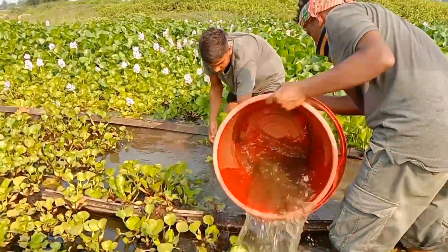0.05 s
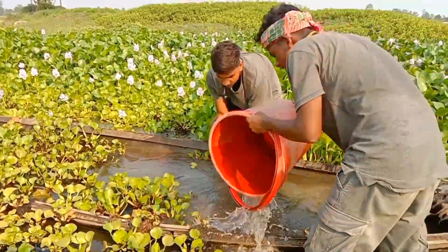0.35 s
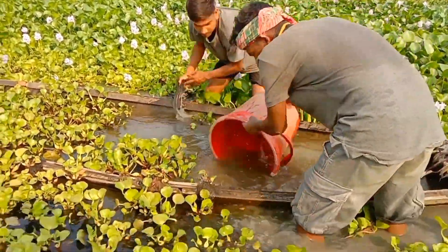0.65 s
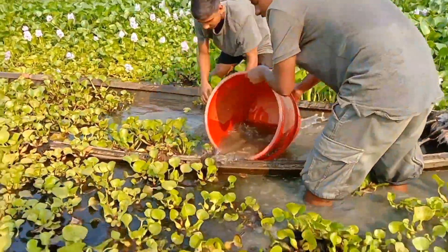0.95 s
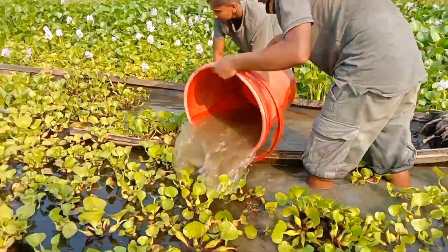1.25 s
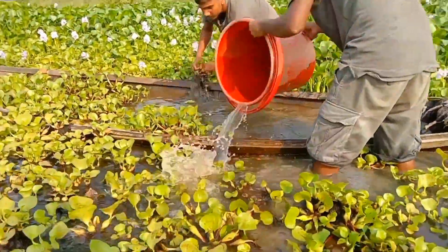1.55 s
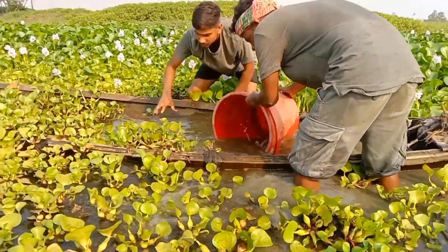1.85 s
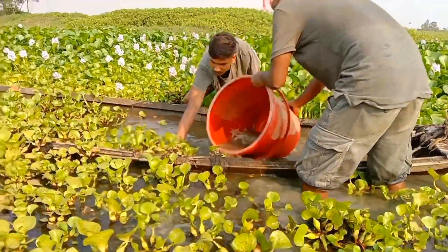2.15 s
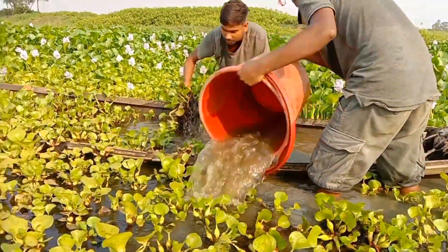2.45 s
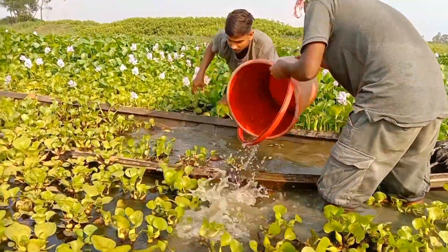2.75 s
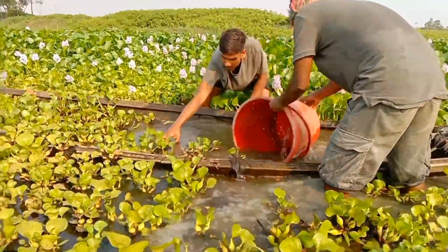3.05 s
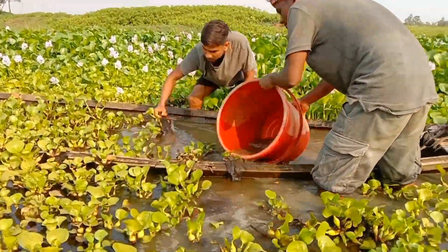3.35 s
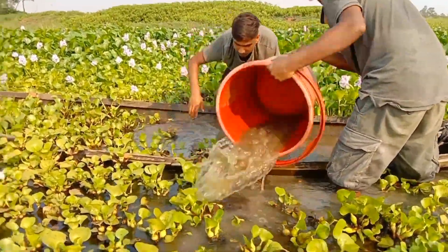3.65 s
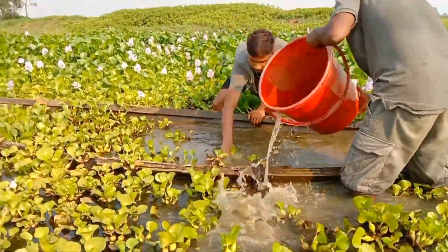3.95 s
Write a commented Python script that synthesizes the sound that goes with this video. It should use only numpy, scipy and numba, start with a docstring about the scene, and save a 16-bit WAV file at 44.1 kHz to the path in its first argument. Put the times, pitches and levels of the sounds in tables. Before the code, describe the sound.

Four bucketfuls of water splash onto a weedy pond as a flooded boat is bailed. Each bubbly, slapping pour alternates with lighter sloshing, trickling and dull plastic knocks, picked up by one microphone in quiet open air.

```python
"""A bucketful of water splashes onto a weedy pond, the first of four bailed from a flooded wooden boat.
Each pour falls as dense spray and small bubbles, with heavier lumps of water slapping the surface.
Between pours the plastic bucket knocks, dips, churns and gulps air, and water sloshes and drips back.
Heard outdoors on one microphone, with faint open air behind and brief reflections from close by."""
import sys
import numpy as np
from scipy import signal
from scipy.fft import rfft, irfft
from scipy.io import wavfile
from scipy.ndimage import uniform_filter1d
from numba import njit

SR = 44100
rng = np.random.default_rng(int(sys.argv[2]) if len(sys.argv) > 2 else 0)


def pcm_store(signal):
    """Save signal as 16-bit PCM."""
    levels = np.round(np.clip(np.atleast_2d(signal), -1, 1) * 32767)
    wavfile.write(sys.argv[1], SR, levels.astype(np.int16).T)


N = 176400
T = np.arange(N) / SR
BUBBLE_GLIDE = 0.038  # pitch rise per decay time, as a share of the starting pitch

# Spectrum of spray landing on the pond. Each row: frequency in Hz, relative level in dB.
SPRAY_SPECTRUM = [(100, -29), (300, -20.5), (500, -4), (1100, 1), (1380, 4), (1900, -4.5), (2550, 0.5),
                  (3000, -2), (3500, 1), (4300, -6), (5600, -6), (6400, -14.5), (7900, -12), (9200, -21.5),
                  (11400, -24), (13000, -19), (15800, -19)]
# Spectrum of the low body of plunging water. Each row: frequency in Hz, relative level in dB.
BODY_SPECTRUM = [(60, -33.5), (150, -7), (270, 5), (420, -1.5), (650, -12.5), (1200, 5.5), (3000, -80)]


def amp(db):
    """Decibels to gain."""
    return 10 ** (np.asarray(db) / 20)


def unit(x):
    """Scales to rms 1."""
    return x / np.sqrt(np.mean(x ** 2) + 1e-20)


def add(mix, start_s, sound):
    """Mixes a sound in at a time."""
    part = mix[max(round(start_s * SR), 0):][:len(sound)]
    part += sound[:len(part)]


def level(curve, column=1):
    """Gain along a curve of seconds and dB, dying at 500 dB a second outside it."""
    times, db = np.transpose(curve)[[0, column]]
    outside_s = np.maximum(np.maximum(times[0] - T, T - times[-1]), 0)
    return amp(np.interp(T, times, db) - 500 * outside_s)


def colour(x, spectrum, tilt_db=0):
    """Causal filter with the given spectrum, tilted per octave; the result has rms 1."""
    size = 4096
    octave = np.log2(np.fft.rfftfreq(size, 1 / SR) + 1)
    hz, db = np.transpose(spectrum)
    cepstrum = irfft(np.log(amp(np.interp(octave, np.log2(hz), db) + tilt_db * octave)))
    cepstrum[1:size // 2] *= 2  # minimum phase keeps attacks sharp
    cepstrum[size // 2 + 1:] = 0
    impulse = irfft(np.exp(rfft(cepstrum)))
    return unit(signal.oaconvolve(x, impulse)[:len(x)])


@njit
def ring_all(size, rows, glide):
    """Sums small rising bubbles. Each row: start in samples, radians per sample, gain, decay in samples."""
    out = np.zeros(size)
    for start, step, gain, decay in rows:
        for i in range(min(int(5 * decay), size - int(start))):
            envelope = gain * np.exp(-i / decay) * min(i * step / 5, 1.)
            out[int(start) + i] += envelope * np.sin(step * i * (1 + glide * i / decay / 2))
    return out


def fizz(per_s, spread_db, cycles, low_hz, high_hz):
    """A cloud of bubbles, each ringing with its own pitch, strength and decay."""
    onset, pitch, size, life = rng.random((50000, 4))[:int(per_s * N / SR)].T
    hz = (np.sqrt(low_hz) + pitch * (np.sqrt(high_hz) - np.sqrt(low_hz))) ** 2
    decay = np.minimum(cycles / hz, .012) * (.5 + life) * SR
    gain = amp(spread_db * np.minimum(-np.log(1 - size), 3.5)) * np.sqrt(np.sqrt(hz) / decay)
    rows = np.column_stack([onset * N, 2 * np.pi * hz / SR, gain, decay])
    return unit(ring_all(N, rows, BUBBLE_GLIDE))


def spatter(per_s, spread_db, burst_s):
    """Drops of unequal size burst on water at random, each a short spit of noise."""
    t = np.arange(SR // 20) / SR
    chance, size, _ = rng.random((3, N))
    impacts = (chance < per_s / SR) * amp(spread_db * np.minimum(-np.log(size + 1e-9), 3.5))
    power = abs(signal.oaconvolve(impacts ** 2, np.exp(-2 * t / burst_s))[:N])
    return unit(np.sqrt(power) * rng.standard_normal(N))


def patchy(x, depth_db, span_hz=480, span_s=.019, smooth_above_hz=4500):
    """Drops land in clusters, so narrow bands flare briefly at random; the treble stays smoother."""
    frame, hop = 512, 128
    bands = signal.stft(x, nperseg=frame, noverlap=frame - hop)[2]
    across = np.fft.fftfreq(bands.shape[0], SR / frame)[:, None]
    along = np.fft.fftfreq(bands.shape[1], hop / SR)
    blur = np.exp(-(across * span_hz) ** 2 - (along * span_s) ** 2)
    flare = unit(np.fft.ifft2(np.fft.fft2(rng.standard_normal(bands.shape)) * blur).real)
    flare /= np.hypot(1, np.linspace(0, SR / 2, len(bands)) / smooth_above_hz)[:, None]
    return unit(signal.istft(bands * amp(depth_db * flare), nperseg=frame, noverlap=frame - hop)[1][:N])


def open_air():
    """A faint, steady hush lies behind everything, strongest in the bass."""
    return amp(-73) * colour(rng.standard_normal(N), [(20, -11.5), (15800, -34)])


def reflections(x, decay_s=.011):
    """Nearby surfaces send a brief, faint scatter back to the microphone."""
    t = np.arange(SR // 6) / SR
    taps = rng.standard_normal(len(t)) * (rng.random(len(t)) < .05) * np.exp(-t / decay_s) * (t > .003)
    return amp(-18) * signal.oaconvolve(x, taps / np.linalg.norm(taps))[:N]


def drips():
    """Runoff trickles thickly over leaves and into the water."""
    # Flow of the trickle. Each row: time in seconds, level in dB.
    flow = [(0.0, -41), (0.43, -37.5), (0.6, -50), (0.8, -40.5), (1.11, -51), (1.17, -67), (1.6, -41),
            (2.0, -49), (2.35, -50), (2.75, -39.5), (3.0, -57.5), (3.4, -44), (4.0, -57)]
    # Spectrum of the patter. Each row: frequency in Hz, relative level in dB.
    spectrum = [(600, -38), (1400, 2.5), (3800, 6), (5500, 1), (8000, -2), (11400, -16.5), (14000, -4.5),
                (15800, -11)]
    plinks = fizz(per_s=2500, spread_db=2, cycles=6, low_hz=1500, high_hz=6000)
    drops = spatter(per_s=800, spread_db=3.6, burst_s=.003) + amp(-5) * plinks
    return colour(patchy(drops, depth_db=3.6), spectrum) * level(flow)


def slosh():
    """Small waves fold over, crackling and trapping a few bubbles."""
    # Water washing round the bucket and the boat. Each row: time in seconds, level in dB.
    swell = [(0.5, -40.5), (0.612, -53.5), (0.645, -37), (0.695, -42.5), (0.79, -40.5), (0.925, -57),
             (0.97, -45.5), (1.06, -44.5), (1.21, -69), (1.62, -79), (1.69, -37), (1.795, -43),
             (1.84, -36.5), (1.91, -53), (2.05, -52.5), (2.1, -39.5), (2.19, -36.5), (2.27, -46.5),
             (2.4, -78), (2.8, -48.5), (2.93, -28.5), (2.975, -44), (3.05, -41), (3.14, -39.5),
             (3.22, -48.5), (3.41, -49.5), (3.5, -43.5), (3.57, -55)]
    # Spectrum of the wash. Each row: frequency in Hz, relative level in dB.
    spectrum = [(60, -22), (200, -14.5), (480, 2.5), (640, -2.5), (800, 0), (1000, 0), (1320, 4.5),
                (1750, -7.5), (3600, -3.5), (5200, -8.5), (6700, -10), (8000, -5.5), (9400, -19.5),
                (11500, -20.5), (13600, -12), (15800, -32)]
    bubbles = fizz(per_s=900, spread_db=3, cycles=5, low_hz=250, high_hz=5000)
    water = bubbles + spatter(per_s=700, spread_db=3, burst_s=.006)
    return colour(patchy(water, depth_db=3.6), spectrum) * level(swell)


def churning(rise_s=0.0031, fade_s=.025):
    """Big bubbles tumble as water rushes into the bucket."""
    # The bucket ploughing under. Each row: start in seconds, hold in seconds, level in dB.
    dips = [(0.646, 0.032, -38), (1.813, 0.037, -36), (1.91, 0.16, -52.5), (2.896, 0.016, -35.5),
            (3.061, 0.1, -37.5)]
    # Spectrum of the low tumble. Each row: frequency in Hz, relative level in dB.
    spectrum = [(20, -92), (75, -4.5), (120, -7.5), (210, -3.5), (380, -20), (1500, -56), (4000, -77)]
    tumble = colour(fizz(per_s=900, spread_db=2.5, cycles=5.3, low_hz=40, high_hz=1200), spectrum)
    envelope = np.zeros(N)
    for start_s, hold_s, db in dips:
        t = T - start_s
        envelope += amp(db) * np.clip(t / rise_s, 0, 1) * np.exp(-np.maximum(t - hold_s, 0) / fade_s)
    return tumble * envelope


def hollows(q=6.4, flutter_db=2.5, flutter_s=.02):
    """Splashing rings the air in the bucket or under a fold of water."""
    # Hollows whose note glides as they open or close.
    # Each row: start in seconds, length in seconds, first and last pitch in Hz, level in dB.
    cavities = [(0.633, 0.033, 1300, 1280, -34), (0.68, 0.44, 784, 800, -45),
                (0.965, 0.038, 274, 346, -40.5), (1.157, 0.043, 1040, 1330, -47),
                (1.3, 0.21, 340, 342, -44), (1.532, 0.076, 375, 520, -44.5), (2.108, 0.11, 253, 252, -45),
                (2.165, 0.036, 684, 950, -46), (2.939, .028, 2200, 1980, -34),
                (2.981, 0.021, 1030, 1280, -35), (3.386, 0.055, 1270, 850, -44.5),
                (3.457, 0.034, 566, 447, -43.5), (3.69, 0.037, 440, 445, -34),
                (3.756, 0.17, 1080, 1510, -38)]
    out = np.zeros(N)
    for start_s, length_s, start_hz, end_hz, db in cavities:
        progress = np.linspace(0, 1, int(length_s * SR))
        carrier = np.exp(2j * np.pi * np.cumsum(start_hz + (end_hz - start_hz) * progress) / SR)
        width_hz = start_hz / q + 2.5 / length_s  # short-lived hollows ring less clearly
        pole = np.exp(-np.pi * width_hz / SR)
        splash = rng.standard_normal(N)[:len(progress)]
        ring = carrier * signal.lfilter([1], [1, -2 * pole, pole * pole], splash / carrier)
        flutter = unit(uniform_filter1d(rng.standard_normal(N), int(flutter_s * SR)))[-len(progress):]
        arch = abs(np.sin(np.pi * progress)) ** 0.16
        add(out, start_s, amp(db) * unit(ring.real * amp(flutter_db * flutter) * arch))
    return out


def gulps(rise_cycles=0.52, wobble=0.029):
    """Large air pockets gulp and smaller ones plop, rising in pitch as they near the surface."""
    # Single air pockets. Each row: start in seconds, pitch in Hz, level in dB, decay time in seconds.
    pockets = [(0.221, 262, -13, 0.0048), (0.348, 890, -14, 0.0023), (0.537, 1240, -15, 0.003),
               (3.08, 220, -30, 0.022), (0.646, 180, -19, 0.012), (0.812, 125, -18, 0.012),
               (1.036, 590, -23, 0.0077), (1.081, 776, -27.5, 0.0076), (1.261, 675, -19.5, 0.013),
               (1.428, 286, -19.5, 0.016), (2.174, 720, -26.5, 0.0063), (2.645, 252, -15.5, 0.0046),
               (3.177, 112, -30.5, 0.02), (3.201, 1416, -28.5, 0.0058), (3.946, 1190, -11, 0.0037),
               (3.947, 225, -10.5, 0.0041)]
    out = np.zeros(N)
    for start_s, hz, db, decay_s in pockets:
        t = np.arange(int(7 * decay_s * SR) + 2) / SR
        shake = unit(uniform_filter1d(rng.standard_normal(N // 4), int(SR / hz) + 1))[:len(t)]
        turns = np.cumsum(hz * (1 + BUBBLE_GLIDE * t / decay_s + wobble * shake)) / SR
        envelope = (1 - np.exp(-(t * hz / rise_cycles) ** 2)) * np.exp(-t / decay_s)
        add(out, start_s, amp(db) * envelope * np.sin(2 * np.pi * turns))
    return out


def knocks(rattle_db=-1.5, rattle_s=0.011):
    """A hard blow and a brief rattle ring the damped wall of the bucket."""
    # The bucket knocking as it is shoved under. Each row: start in seconds, level in dB.
    blows = [(0.534, -23), (0.819, -20), (0.946, -21.5), (1.81, -24.5), (2.062, -28.5), (3.075, -22.5)]
    # Modes of its water-loaded plastic wall. Each row: pitch in Hz, level in dB, decay time in seconds.
    modes = [(209, -5.5, 0.012), (546, -6, 0.0024), (850, -5, 0.0036), (1290, -5, 0.0026),
             (2200, -8.5, 0.0013)]
    out, t = np.zeros(N), np.arange(SR // 10) / SR
    for start_s, db in blows:
        wall = sum(amp(mode_db) * np.sin(2 * np.pi * hz * rng.uniform(.94, 1.06) * t)
                   * np.exp(-t / decay_s) for hz, mode_db, decay_s in modes)
        chatter = rng.standard_normal(len(t)) * t * np.exp(-2 * t / rattle_s)
        rattle = signal.oaconvolve(wall, chatter / np.linalg.norm(chatter))[:len(t)]
        add(out, start_s, amp(db) * (wall + amp(rattle_db) * rattle))
    return out


def slaps(rise_s=0.0027, fade_s=0.0082):
    """Each lump of water lands with a sudden dense burst that dies fast."""
    # Lumps hitting the surface.
    # Each row: start in seconds, level in dB, hold in seconds, brightness in dB per octave.
    lumps = [(0.006, -26, 0.019, -1.5), (0.221, -21, 0.012, 1), (0.347, -24.5, 0.0091, -1),
             (0.468, -31.5, 0.0052, 2.5), (0.532, -20.5, 0.0062, 1.5), (0.545, -23, 0.0038, 0),
             (0.619, -34.5, 0.004, 0.5), (0.634, -33.5, 0.016, -4), (0.708, -29, 0.0072, 1),
             (1.031, -34, 0.011, -2.5), (1.265, -31.5, 0.024, -0.5), (1.427, -25, 0.016, -2.5),
             (1.446, -27, 0.012, -4.5), (3.127, -40.5, 0.035, 3.5), (1.663, -32, 0.02, 0),
             (1.738, -31, 0.032, -1.5), (1.934, -32.5, 0.0058, 3), (2.077, -32.5, 0.025, 0.5),
             (2.278, -40.5, 0.015, -0.5), (2.498, -26.5, 0.019, -2), (2.594, -22, 0.019, -2.5),
             (2.654, -25.5, 0.0083, 0), (2.854, -35, 0.0084, 2.5), (2.926, -28, 0.0069, 1),
             (3.455, -29.5, 0.014, 3), (3.512, -38, 0.019, 1), (3.641, -36.5, 0.029, 5.5),
             (3.676, -26.5, 0.017, 2), (3.944, -17.5, 0.0017, -3.5)]
    out, t = np.zeros(N), np.arange(SR // 8) / SR
    water = spatter(per_s=1500, spread_db=-2.5, burst_s=0.00047)
    water += fizz(per_s=9000, spread_db=2.5, cycles=6.45, low_hz=286, high_hz=9640)
    for start_s, db, hold_s, tilt_db in lumps:
        burst = water[rng.integers(N - len(t)):][:len(t)]
        envelope = np.minimum(t / rise_s, 1) * np.exp(-np.maximum(t - hold_s, 0) / fade_s)
        spray = colour(burst, SPRAY_SPECTRUM, tilt_db)
        body = amp(-14.5 - 2 * tilt_db) * colour(burst, BODY_SPECTRUM)  # duller slaps carry more body
        add(out, start_s, amp(db) * envelope * (spray + body))
    return out


def pours():
    """The stream breaks into spray and bubbles, with a low body where it plunges deep."""
    # The falling stream, one curve per pour. Each row: time in seconds, spray and body levels in dB.
    streams = [
        [(0.0, -26.5, -72), (0.04, -37.5, -48), (0.1, -33.5, -68), (0.142, -25, -62), (0.165, -35.5, -50),
         (0.205, -24.5, -38.5), (0.32, -30.5, -42), (0.44, -39.5, -56)],
        [(1.215, -69, -87), (1.245, -39, -80), (1.265, -28.5, -29.5), (1.32, -32.5, -42.5), (1.37, -32.5, -35),
         (1.45, -28.5, -33), (1.51, -30.5, -88), (1.585, -34, -52), (1.655, -44.5, -56)],
        [(2.385, -78, -77), (2.405, -38, -86), (2.44, -29, -49), (2.51, -29, -37.5), (2.59, -31, -36),
         (2.655, -28.5, -33.5), (2.7, -34, -42.5), (2.79, -48.5, -66)],
        [(3.63, -45.5, -63), (3.678, -36, -46), (3.695, -25, -28), (3.745, -28.5, -50), (3.81, -31, -42),
         (3.865, -28.5, -37), (3.91, -36.5, -48), (3.938, -39, -42), (3.965, -30.5, -25.5), (4.0, -35, -49)],
    ]
    bubbles = fizz(per_s=5000, spread_db=2.7, cycles=4.5, low_hz=400, high_hz=8000)
    sheet = spatter(per_s=3000, spread_db=1.5, burst_s=0.004)
    spray = colour(patchy(bubbles + amp(7) * sheet, depth_db=2.2), SPRAY_SPECTRUM)
    body = colour(fizz(per_s=3000, spread_db=6, cycles=2.06, low_hz=67, high_hz=1560), BODY_SPECTRUM)
    return sum(spray * level(curve) + body * level(curve, column=2) for curve in streams)


def scene():
    """The bailing and its reflections reach one microphone over faint open air."""
    bailing = pours() + slosh() + drips() + slaps() + knocks() + gulps() + hollows() + churning()
    return (bailing + reflections(bailing) + open_air())[None]


def record(dry):
    """The deepest bass is cut away, and the recorder's band limit ends the treble."""
    low_cut_hz, band_limit_hz = 70, 15850
    low_cut = signal.butter(2, low_cut_hz, "high", fs=SR, output="sos")
    band_limit = signal.firwin(511, band_limit_hz, window=("kaiser", 9), fs=SR)
    return signal.oaconvolve(signal.sosfilt(low_cut, dry), band_limit[None], "same")


dry = scene()
out = record(dry)
pcm_store(out)
```